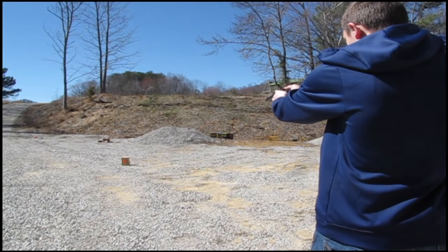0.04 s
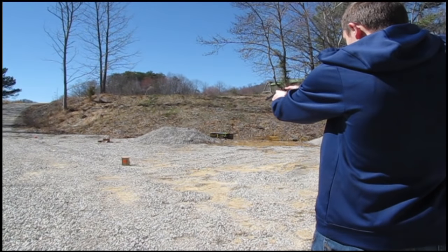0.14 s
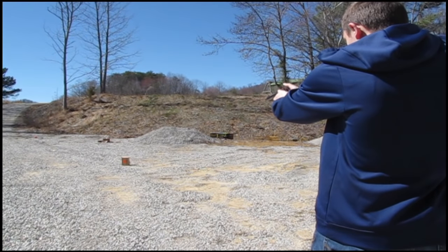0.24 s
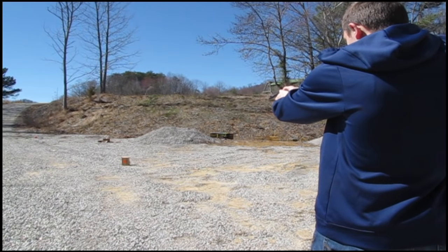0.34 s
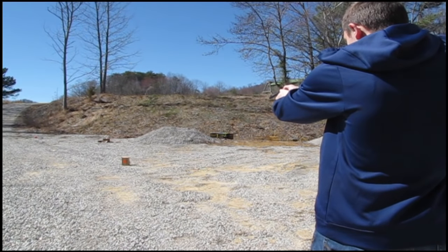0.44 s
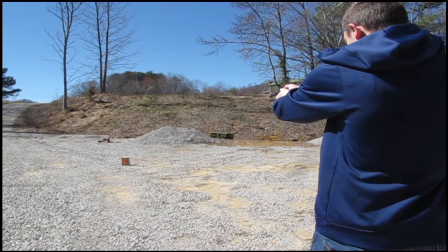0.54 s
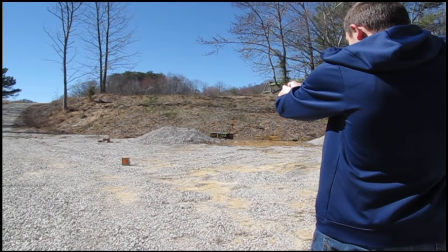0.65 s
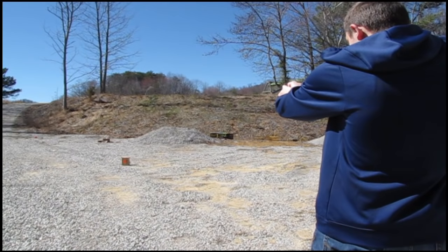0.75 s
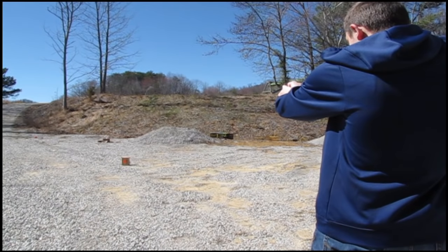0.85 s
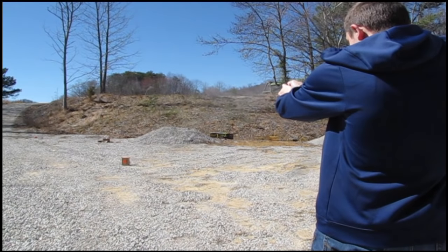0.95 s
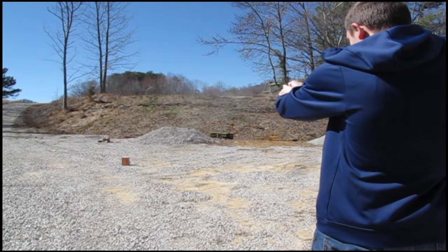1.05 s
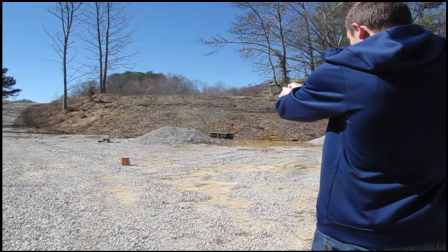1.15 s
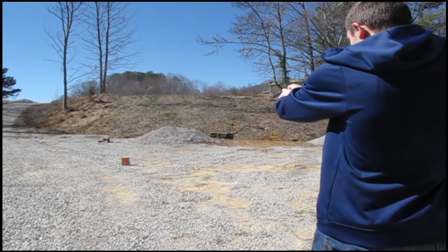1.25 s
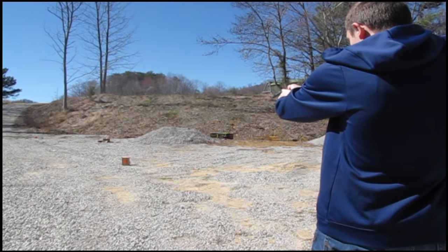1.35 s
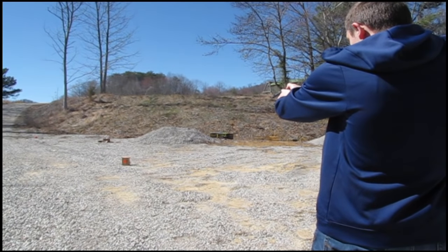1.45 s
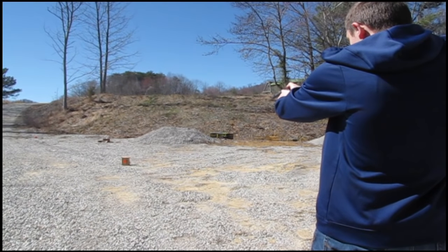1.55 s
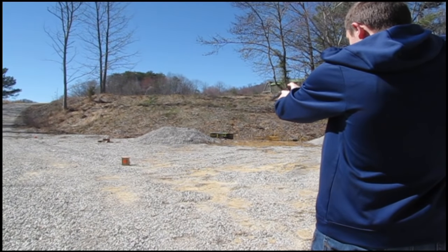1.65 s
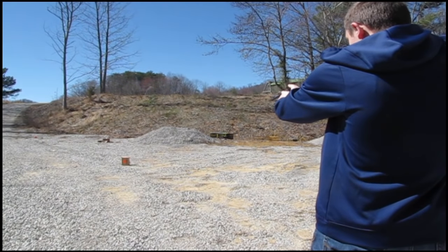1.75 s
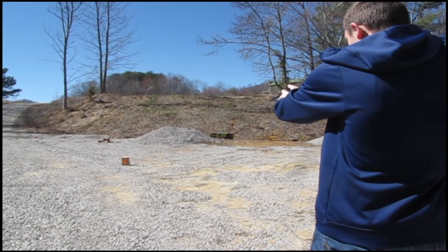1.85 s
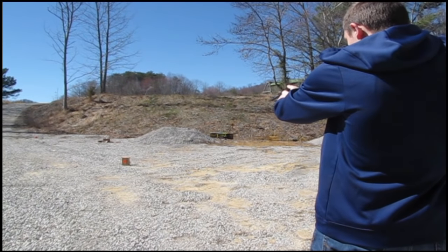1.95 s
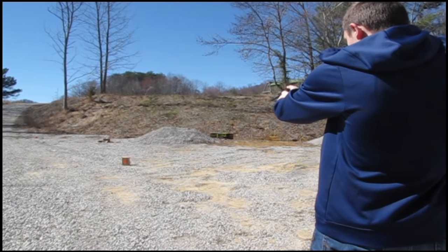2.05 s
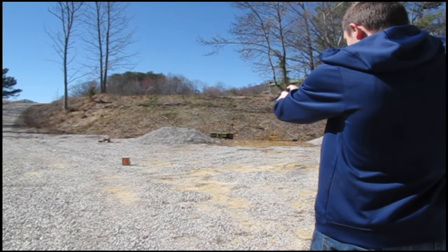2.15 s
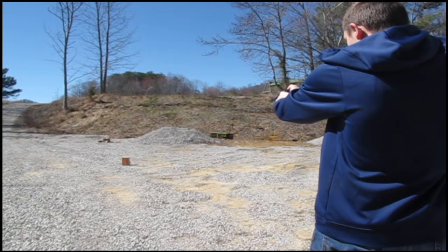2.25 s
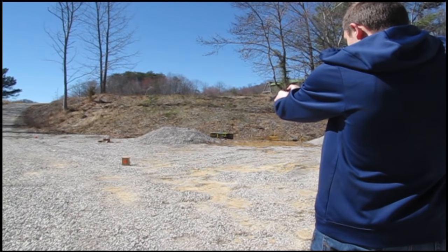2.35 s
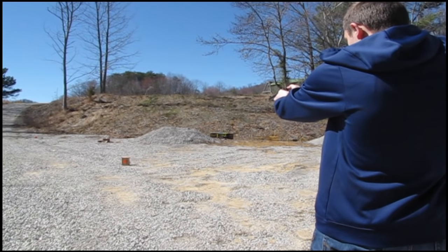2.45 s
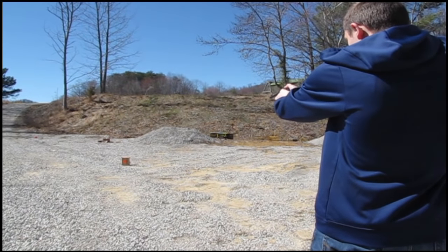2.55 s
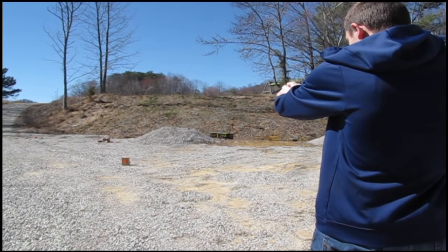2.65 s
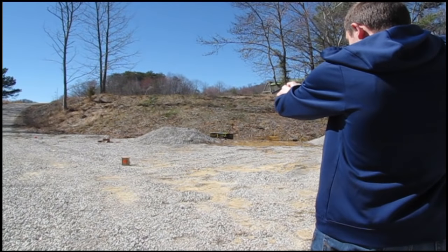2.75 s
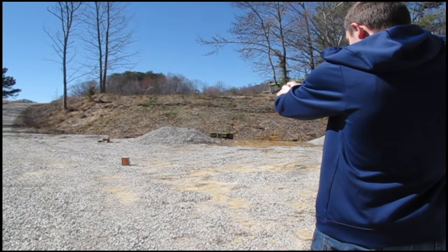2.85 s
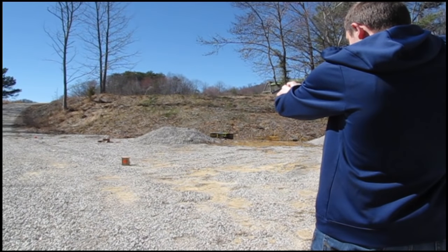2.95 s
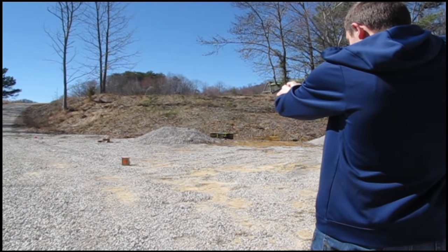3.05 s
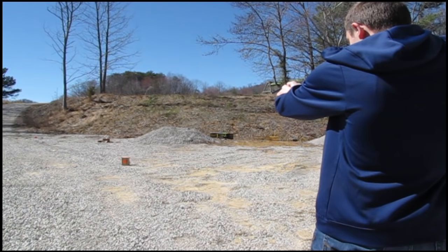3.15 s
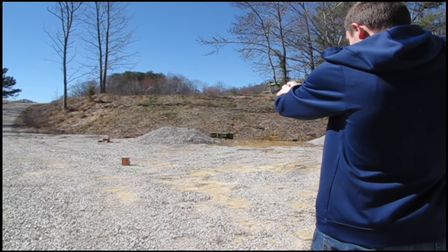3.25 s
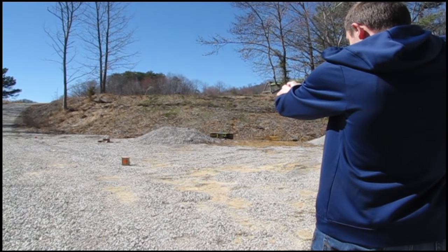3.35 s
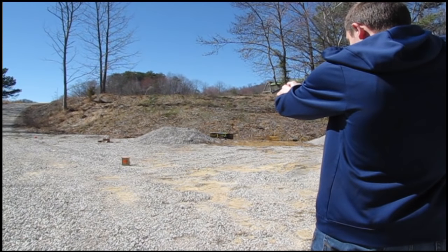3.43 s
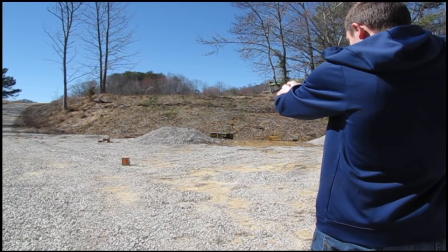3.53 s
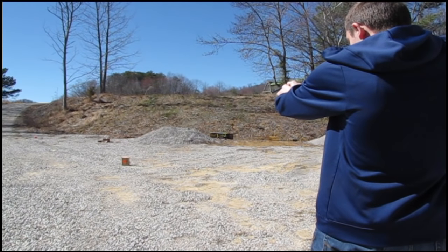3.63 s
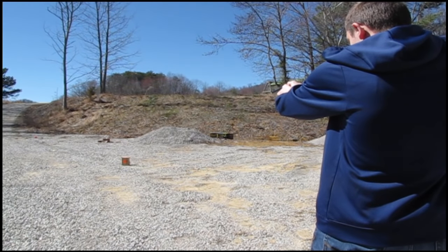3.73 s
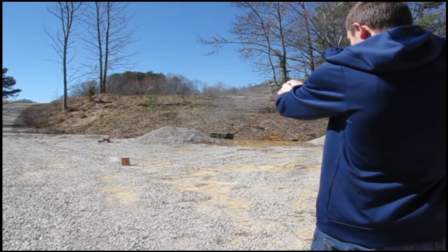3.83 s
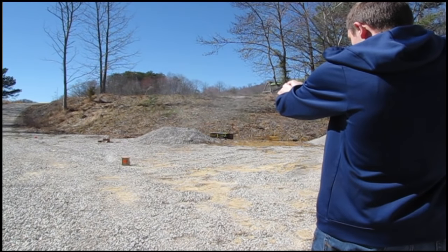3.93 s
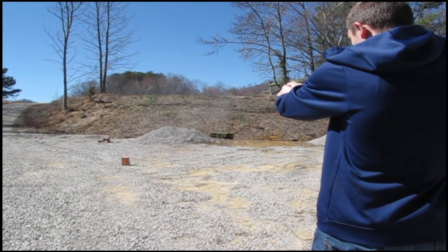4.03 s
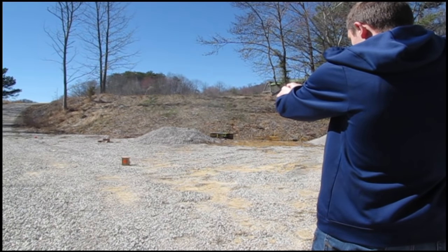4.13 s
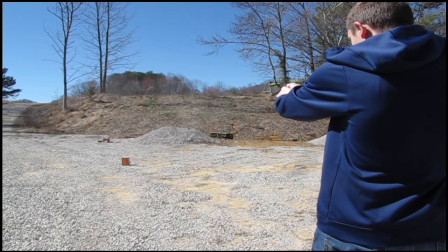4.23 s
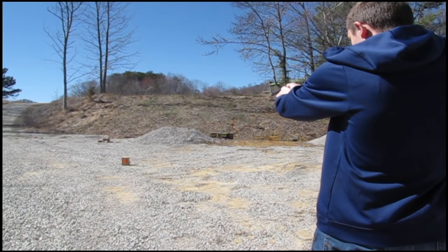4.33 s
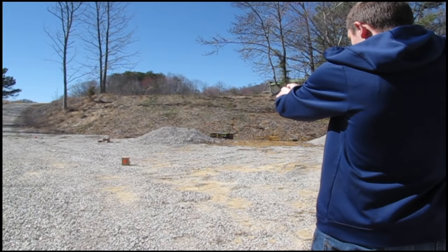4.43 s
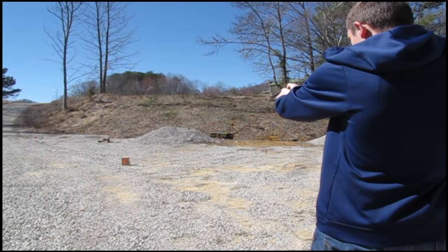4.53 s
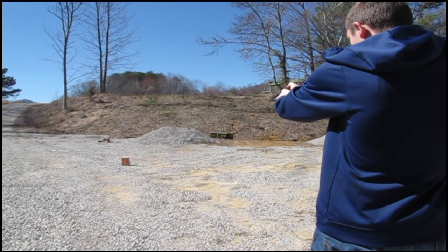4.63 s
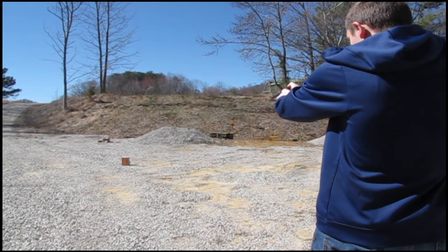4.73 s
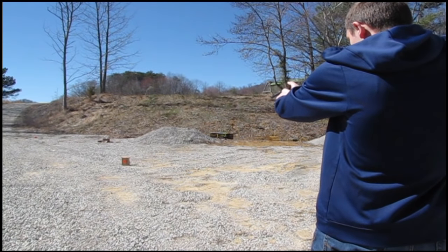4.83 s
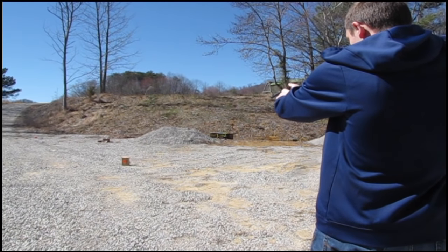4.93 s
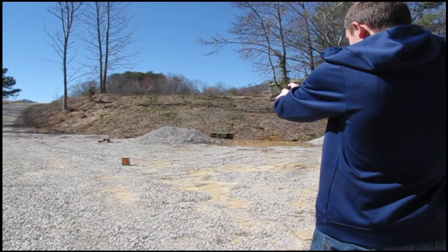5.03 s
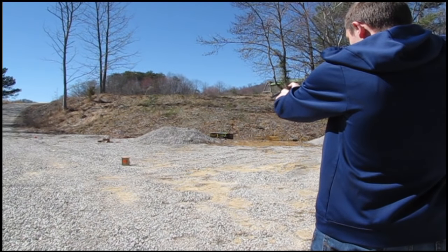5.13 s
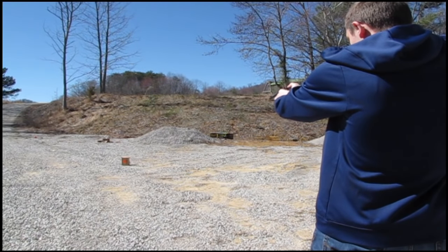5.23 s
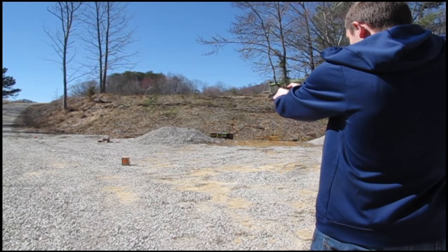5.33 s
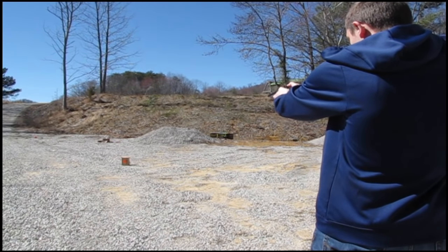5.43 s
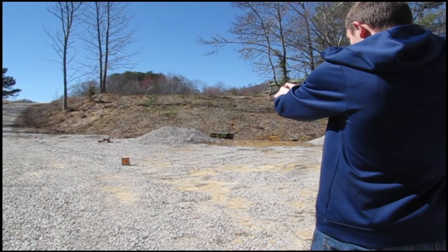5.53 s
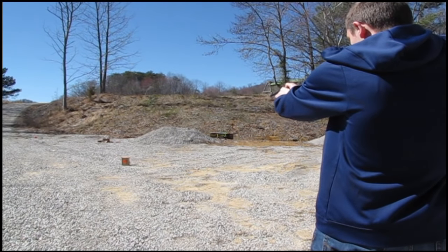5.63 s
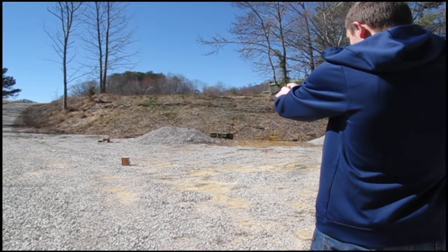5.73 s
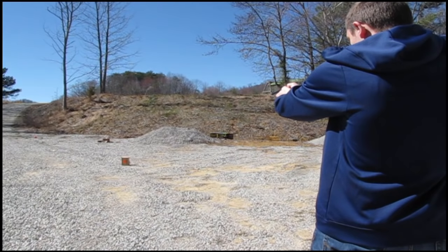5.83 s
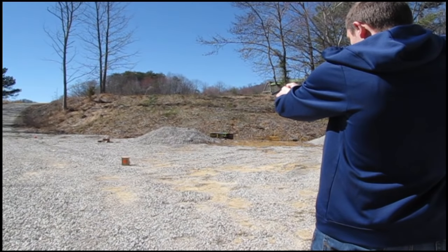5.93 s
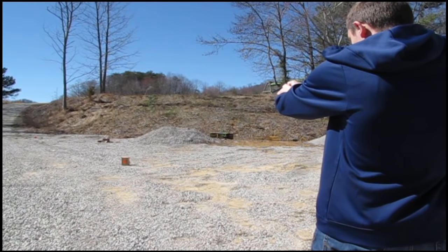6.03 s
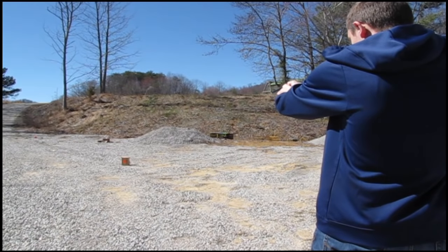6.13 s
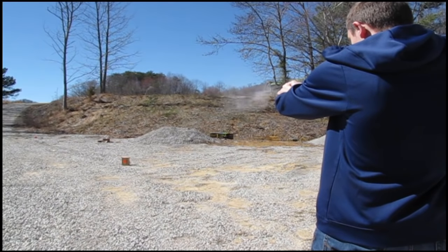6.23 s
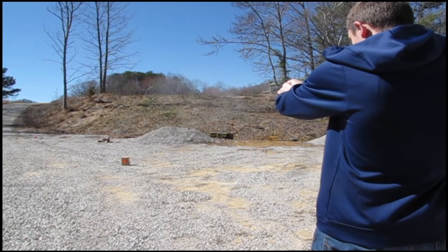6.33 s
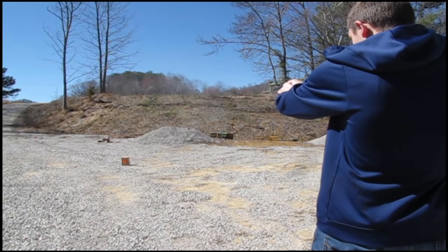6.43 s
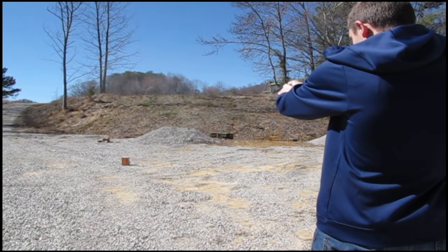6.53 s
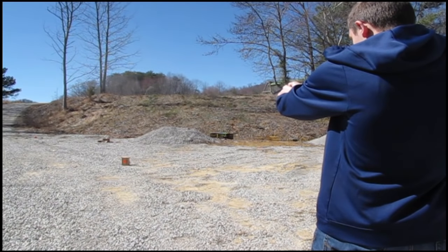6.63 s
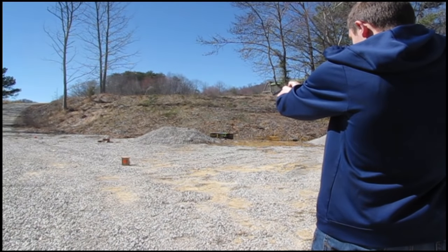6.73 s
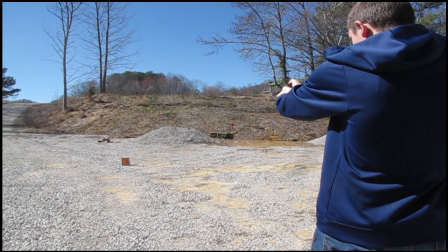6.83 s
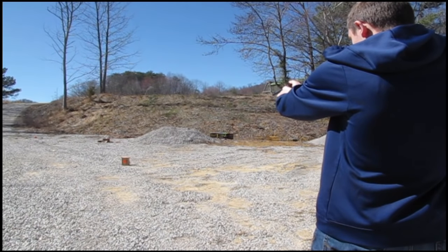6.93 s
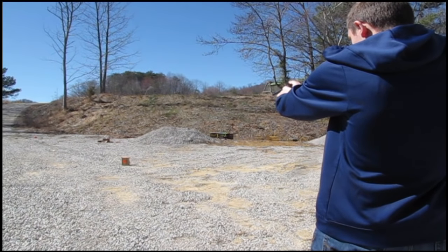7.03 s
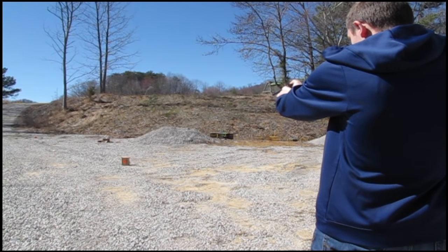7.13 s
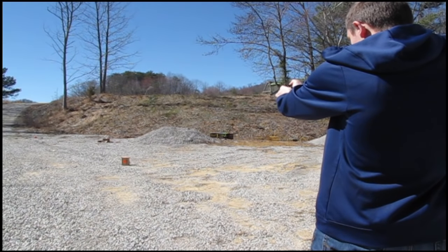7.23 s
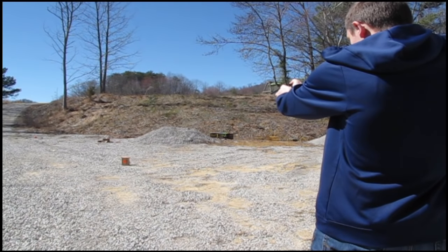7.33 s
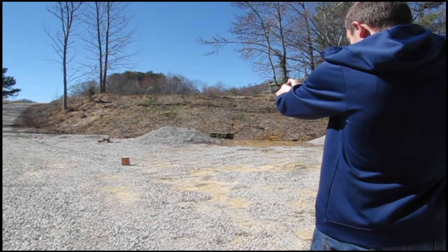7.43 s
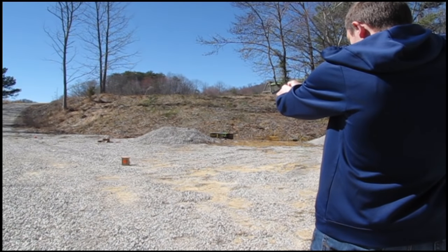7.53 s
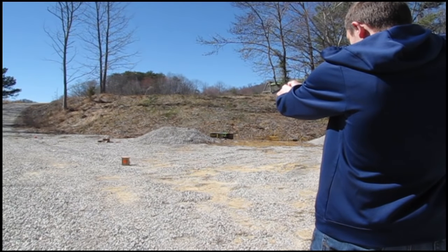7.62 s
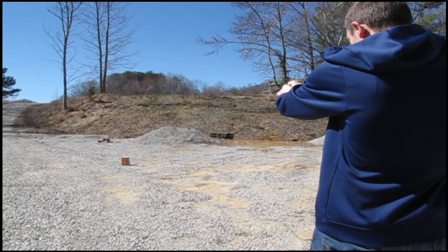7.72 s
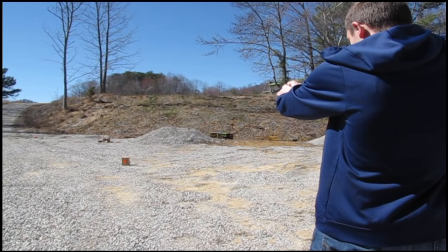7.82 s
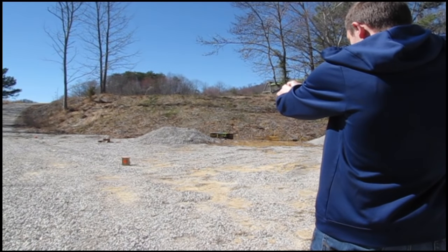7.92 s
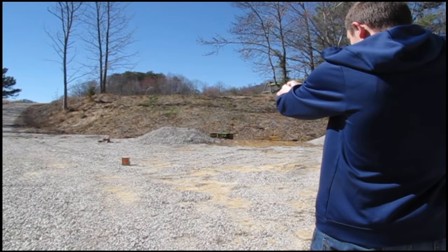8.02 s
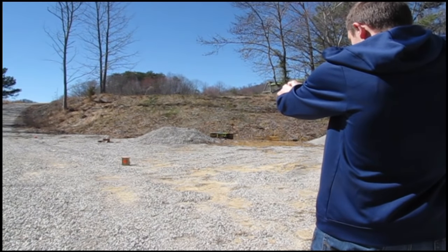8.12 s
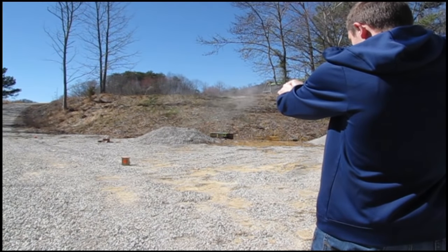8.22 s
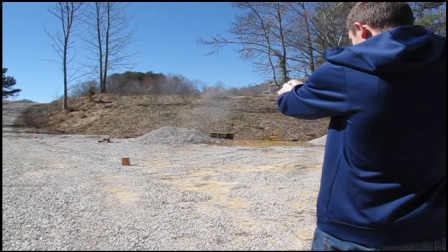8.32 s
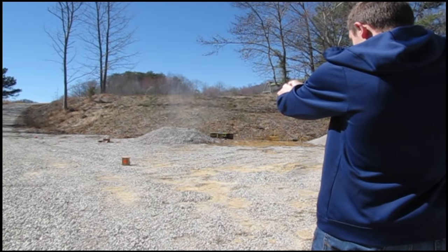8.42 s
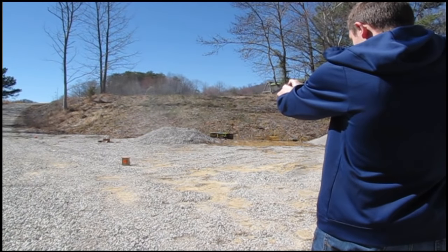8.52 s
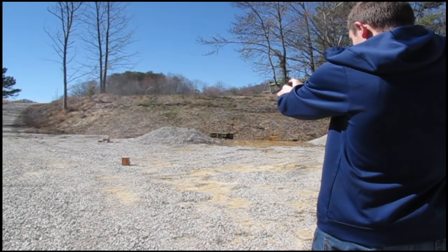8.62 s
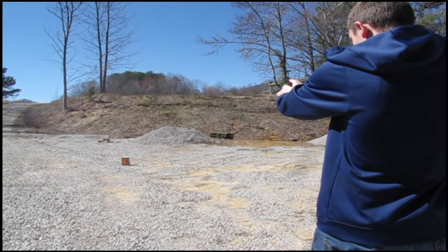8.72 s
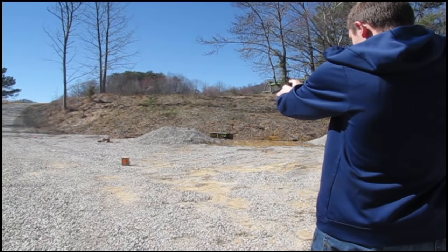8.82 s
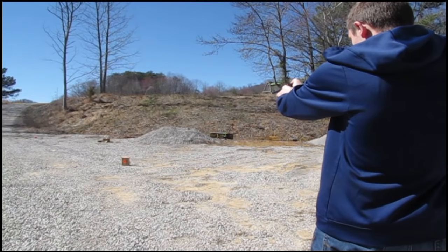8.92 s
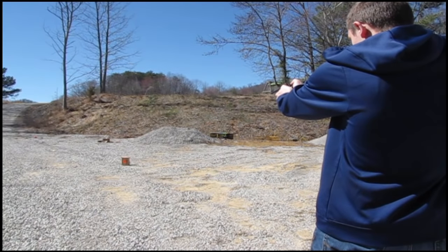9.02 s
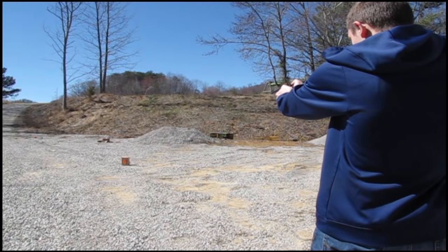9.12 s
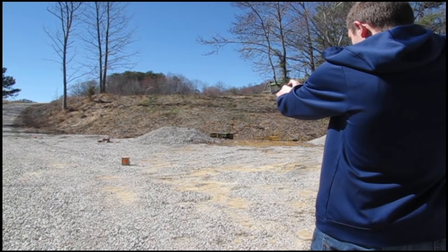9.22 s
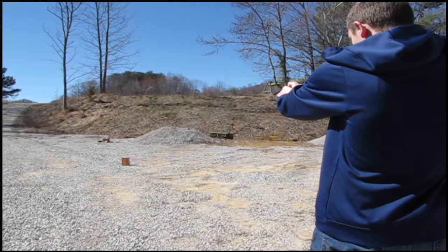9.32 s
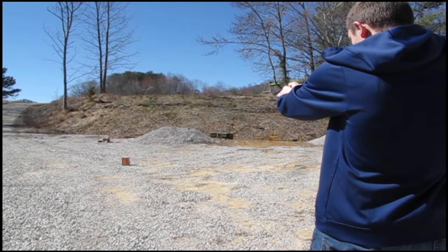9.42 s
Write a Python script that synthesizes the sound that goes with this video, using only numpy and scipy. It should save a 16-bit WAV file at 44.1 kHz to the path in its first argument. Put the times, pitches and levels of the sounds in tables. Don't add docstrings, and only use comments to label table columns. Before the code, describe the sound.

A revolver fires four times a few steps from a small camera on a gravel lot. Each shot is a hard, clipped crack with a dense slap from ground and bank, then a lumpy tree-line echo fading within about a second. Between shots, the hammer and cylinder click, metal rattles lightly, wind thumps the microphone, and leaves rustle faintly.

```python
import sys
import numpy as np
from scipy import signal
from scipy.fft import rfft, irfft, next_fast_len
from scipy.io import wavfile
from scipy.ndimage import uniform_filter1d

SR = 44100
rng = np.random.default_rng(int(sys.argv[2]) if len(sys.argv) > 2 else 0)


def to_linear_factor(level_db):
    exponent = np.asarray(level_db, float) / 20
    return 10 ** exponent


def transcribe(signal):
    frames = np.atleast_2d(signal).T
    limited = np.clip(frames, -1, 1)
    pcm = np.round(limited * 32767).astype(np.int16)
    wavfile.write(sys.argv[1], SR, pcm)


N = 417627
TOP_HZ = 15800

# time in seconds, suction strength [0-2], ground bounce strength [0-2],
# gas roar in dB.
SHOTS = [
    (.8892, 1.05, 1.6, 2),
    (3.7586, 1.7, 1.9, 2),
    (6.2480, 1.0, 1.6, 2),
    (8.1992, .65, 1.3, 2),
]
# delay in seconds, build-up in seconds, t60 in seconds,
# centre in Hz, width in Hz, level in dB.
SURFACES = [
    (.005, 0.0034, 0.073, 5447, 7023, -9),
    (.005, 0.0035, .2, 1759, 2558, -12.5),
    (.0325, .002, 0.08, 1550, 1100, -13.5),
    (.0325, .002, 0.085, 4510, 5937, -12),
    (.036, .004, 0.1, 1000, 451, -11.5),
    (.055, .01, .25, 1000, 1867, -21),
    (.02, .006, .3, 401.5, 350, -18),
    (.048, .003, 0.15, 3995, 5890, -23),
    (.13, 0.07, 0.77, 3180, 2530, -41),
    (.53, 0.03, 0.51, 970, 960, -43.5),
]


def unit(x):
    return x / np.sqrt(np.mean(x ** 2))


def on_log(table, hz):
    table_hz, value = np.transpose(table)
    return np.interp(np.log(np.maximum(hz, 1)), np.log(table_hz), value)


def band(x, hz, width):
    centre = min(hz, SR / 2.2)
    return signal.lfilter(*signal.iirpeak(centre, hz / min(width, SR / 3), fs=SR), x)


def steep(x, hz, width):
    return band(band(x, hz, width), hz, width)


def coloured(table):
    size = next_fast_len(N)
    hz = np.arange(size // 2 + 1) * SR / size
    spectrum = rfft(rng.standard_normal(size)) * to_linear_factor(on_log(table, hz))
    return unit(irfft(spectrum, size))[:N]


def walk(rate):
    k = int(SR / rate)
    held = np.repeat(rng.standard_normal(N // k + 1), k)
    return uniform_filter1d(uniform_filter1d(held, k), k)[:N]


def swell(t, delay, build, t60):
    u = np.maximum(t - delay, 0)
    return (1 - np.exp(-u / build)) * to_linear_factor(-60 * u / t60)


def revolver():
    hammer_lead_s = .007
    size = 2 ** 16
    out = np.zeros(N + size)
    t = np.arange(size) / SR
    fired = t - hammer_lead_s
    place = rng.standard_normal((len(SURFACES) + 1, size))
    for s, suction, bounce, roar_db in SHOTS:
        hammer = to_linear_factor(-25) * swell(t, 0., .00056, .06) * unit(steep(rng.standard_normal(size), 3600, 7000))
        grain = place + .72 * rng.standard_normal(place.shape)
        grain[0] = rng.standard_normal(size)
        start = int((s - hammer_lead_s) * SR)
        shot = blast(fired + .00081, suction, bounce, roar_db)
        out[start:start + size] += hammer + shot + surroundings(fired, grain)
    return out[:N]


def blast(t, suction, bounce, roar_db):
    bounce_s, muzzle_hz = .0063, 1450
    jet = swell(t, 0., .002, .06) * 1.25 / (1 + (np.maximum(t, 0) / .0032) ** 8)
    jet += .22 * swell(t, .002, .0005, .04) + .5 * swell(t, .0062, .0002, .006)
    roar = to_linear_factor(roar_db) * jet * unit(steep(rng.standard_normal(len(t)), 2900, 6500))
    flap = .3 + .6 * np.cos(2 * np.pi * muzzle_hz * (t - .0015))
    push = flap * np.exp(-((t - .0018) / .0008) ** 2)
    ground = t > bounce_s
    pull = -1.25 * suction * swell(t, .0022, .0003, .005 + .03 * suction) * ~ground
    rebound = bounce * ground * swell(t, bounce_s, .00015, .02)
    rebound = rebound / (1 + (np.maximum(t - bounce_s, 0) / .00065) ** 5)
    swing = .24 * swell(t, .009, .005, .08) - (1.25 - suction) * .55 * swell(t, .0072, .0004, .025)
    return roar + push + pull + rebound + swing


def surroundings(t, grain):
    scatter = np.zeros(len(t))
    for noise, (delay, build, t60, hz, width, db) in zip(grain, SURFACES):
        scatter += to_linear_factor(db) * swell(t, delay, build, t60) * unit(steep(noise, hz, 1.3 * width))
    return scatter + hard_returns(t, grain[0]) + tree_line(t, grain)


def hard_returns(t, chance):
    # delay in seconds, centre in Hz, width in Hz, level in dB.
    slaps = [(.0275, 1196, 1196, -14.5), (0.0334, 1494, 1499, -11.5), (0.0349, 900, 1000, -7.5),
             (0.039, 1550, 1010, -9.5), (0.0409, 1000, 1000, -11.5), (0.0454, 950, 981, -4.5),
             (0.0533, 1210, 2520, -12), (.07, 1012, 1494, -19.5), (0.0507, 9100, 7000, -15.5),
             (0.0853, 845, 700, -12), (0.0892, 910, 1000, -17), (0.092, 970, 1810, -13.5),
             (0.0917, 5006, 4500, -14), (.551, 1070, 1300, -31), (0.5718, 954, 502, -52),
             (.575, 740, 500, -40.5), (.5785, 770, 600, -31), (0.595, 847, 599.6, -44),
             (.73, 800, 600, -42), (.745, 790, 600, -43)]
    # delay in seconds, centre in Hz, level in dB.
    trunks = [(0.1174, 820, -17), (0.1216, 860, -33), (0.1254, 730, -18), (0.1391, 1190, -18),
              (0.1559, 1548, -12.5), (0.1756, 595, -15), (0.1869, 1370, -18), (0.2062, 790, -21.5),
              (0.2143, 710, -18), (0.2265, 817, -40), (0.2378, 989, -29), (0.2526, 820, -20.5),
              (0.2571, 925, -26), (0.2759, 1118, -23.5), (0.2847, 1032, -30), (0.3046, 731, -50),
              (0.3215, 903, -37), (0.3287, 989, -47), (0.3375, 890, -37), (0.3464, 731, -46),
              (0.3601, 903, -51), (0.3899, 688, -38), (0.3979, 903, -43), (0.4059, 800, -50),
              (0.4143, 817, -45), (0.4179, 930, -45), (0.4263, 860, -39), (0.4332, 680, -46),
              (0.4499, 790, -34), (0.4604, 725, -35), (0.4744, 946, -35), (0.4857, 860, -40),
              (0.508, 1118, -33), (0.6383, 688, -43.5), (0.6546, 903, -34), (0.6927, 989, -39)]
    returns = list(slaps)
    for k, (delay, hz, db) in enumerate(trunks):
        returns.append((delay, hz, .56 * hz, db - 5 + chance[k]))
    out = np.zeros(len(t))
    for delay, hz, width, db in returns:
        ring = echo(hz, width)
        at = np.searchsorted(t, delay)
        out[at:at + len(ring)] += to_linear_factor(db) * ring
    return out


def echo(hz, width):
    impulse = np.eye(1, 1024)[0]
    ring = band(steep(impulse, hz, width), hz, 2 * width)
    return -ring / np.abs(ring).max()


def tree_line(t, grain):
    # frequency in Hz, density in dB per Hz.
    trees = [(59, -56), (100, -17), (266, -7.5), (535, -4), (634, -5.5), (705, -3.5), (768, -5), (1060, -6),
             (2990, -12.5), (9610, -26), (14800, -40), (16300, -44)]
    # frequency in Hz, t60 in seconds.
    trees_t60 = [(150, 1), (400, 0.89), (900, 1.26), (2000, 0.91), (4000, 0.69), (8000, 0.54),
                 (14000, 0.61)]
    hz = np.arange(len(t) // 2 + 1) * SR / len(t)
    spectrum = rfft(grain[-1]) * to_linear_factor(on_log(trees, hz))
    spectrum = spectrum / np.sqrt(np.mean(irfft(spectrum) ** 2))
    out = np.zeros(len(t))
    for centre in 100 * 2 ** (np.arange(16) / 2):
        share = np.clip(1 - 2 * np.abs(np.log2(np.maximum(hz, 1) / centre)), 0, 1)
        fade = swell(t, .1, .012, on_log(trees_t60, centre))
        clumps = unit(uniform_filter1d(grain[0], 300))
        clumps = clumps + unit(uniform_filter1d(np.roll(grain[1], int(9 * centre)), 500))
        out += to_linear_factor(-24.5 + .89 * clumps) * fade * irfft(spectrum * share, len(t))
    return out


def lockwork():
    # frequency in Hz, level in dB, t60 in seconds.
    steel = [(1550, -11, 0.015), (2070, -7, 0.011), (2780, -7.5, 0.016), (4050, -7.5, 0.028),
             (5100, -11.5, 0.008), (7800, -16.5, .012)]
    click_hz, click_width_hz = 5000, 9000
    frame_reach_hz = 4500
    size = 3072
    out = np.zeros(N + size)
    t = np.arange(size) / SR
    rows = steel_rows()
    chance = rng.standard_normal((len(rows), 3, size))

    def ring(blow, hz):
        return unit(band(band(blow, hz, hz / 2), hz, 420 + .053 * hz))

    for (s, db, hz, second_hz, t60, rattle_db, ringing), (chatter, hiss, share) in zip(rows, chance):
        blow = chatter * swell(t, .00053, .000098, np.clip(t60, .003, .06))
        blow[20] += 4.4
        part = unit(steep(blow, max(hz, click_hz), click_width_hz))
        part = part + ringing * (ring(blow, hz) + to_linear_factor(-6.5) * ring(blow, second_hz))
        frame = np.zeros(size)
        for k, (mode_hz, mode_db, mode_t60) in enumerate(steel):
            tone = np.sin(2 * np.pi * mode_hz * (1 + .026 * share[-k - 1]) * t)
            frame += to_linear_factor(mode_db + 2.5 * share[k]) * tone * to_linear_factor(-60 * t / mode_t60)
        patches = to_linear_factor(2.5 * np.tanh(unit(uniform_filter1d(share, 120))))
        rattle = to_linear_factor(rattle_db + 3 * hiss[0]) * swell(t, .002, .0037, .087)
        rattle = rattle * patches * unit(steep(hiss, 4200, 7400))
        shake = .42 * min(frame_reach_hz / hz, 1) ** 3
        start = int(s * SR)
        out[start:start + size] += to_linear_factor(db - .5) * (part / np.abs(part).max() + shake * frame + .27 * rattle)
    return out[:N]


def steel_rows():
    # time in seconds, peak in dB,
    # ring in Hz, second ring in Hz, t60 in seconds.
    cocking = [(0.0061, -31.5, 2340, 3960, 0.026), (0.0227, -27.5, 4000, 4610, 0.0035),
               (0.1959, -31, 1570, 4840, 0.011), (1.6306, -31, 8200, 6940, 0.01),
               (2.1614, -28.5, 4660, 1690, 0.006), (2.1653, -41, 3320, 1680, 0.007),
               (2.2052, -32, 4200, 3250, 0.0057), (2.2204, -28.5, 3940, 1570, 0.0056),
               (2.2601, -28, 3810, 5770, 0.0073), (2.2673, -26.5, 5280, 4000, 0.0083),
               (2.273, -47, 9500, 2600, 0.012), (2.291, -23.5, 4000, 2130, 0.014),
               (2.471, -28.5, 1470, 2580, 0.008), (2.4737, -29, 1440, 4740, 0.011),
               (4.4862, -35, 6660, 3640, 0.006), (4.9818, -27.5, 6660, 7900, 0.0074),
               (5.043, -45, 3800, 5000, 0.056), (5.1128, -25.5, 2150, 3180, 0.003),
               (5.1181, -41, 3120, 8870, 0.006), (5.1644, -33, 9500, 10400, 0.0056),
               (5.182, -28, 3840, 2850, 0.005), (5.2262, -30, 3870, 2820, 0.0069),
               (5.2378, -34, 2630, 5150, 0.0137), (5.2397, -28.5, 2770, 3340, 0.01),
               (5.2513, -22.5, 3970, 2100, 0.0078), (5.2723, -28, 4930, 6590, 0.0064),
               (5.3604, -33, 4200, 7600, 0.012), (5.3783, -25.5, 4900, 4100, 0.026),
               (5.396, -41, 4400, 5200, 0.025), (5.4298, -28, 2270, 3000, 0.019),
               (5.435, -43, 2500, 9600, 0.01), (7.1205, -33.5, 3800, 3100, 0.0055),
               (7.195, -32, 2680, 4900, 0.015), (7.2106, -29.5, 4050, 2000, 0.0069),
               (8.9757, -35.5, 3810, 5020, 0.009), (8.9938, -33, 4180, 2070, 0.0084),
               (9.1884, -34.5, 3730, 1580, 0.013)]
    # time in seconds, peak in dB, ring in Hz.
    settling = [(0.1497, -40, 6950), (.174, -49, 6000), (.2892, -55, 4500), (0.4873, -43, 3760),
                (.5026, -45, 3650), (.5683, -44, 4980), (.581, -41, 3930), (.7564, -43, 3300),
                (1.5516, -45, 4140), (1.7333, -41.5, 4560), (1.8333, -35.5, 4700), (2.3263, -43, 8200),
                (2.5065, -42, 4870), (4.3093, -48, 2140), (4.513, -38.5, 4540), (4.5823, -52, 4200),
                (5.0015, -45, 4790), (5.198, -39, 2870), (7.1515, -42, 2820), (7.1893, -33.5, 4500),
                (7.202, -36, 5130), (7.3662, -35.5, 2580), (8.8912, -38, 6500), (8.945, -41, 4580),
                (8.9677, -40, 4390), (9.1233, -48.5, 5510), (9.2497, -53, 3060), (9.3834, -42.5, 4580),
                (9.4245, -56, 3080)]
    sear = [
        (.8642, -29, 4000),
        (3.7347, -26, 4000),
        (6.2225, -32, 4200),
        (8.1735, -34, 3800),
    ]
    spring = [(.094, -49, 5950), (.2186, -47, 6900), (.3709, -41, 11780), (.3758, -38, 8000),
              (.552, -48, 6110), (4.2812, -38, 6730), (4.3221, -41, 7000), (4.3885, -44, 5670),
              (4.4549, -38, 5600), (4.5076, -42, 6270), (4.7246, -41, 6140), (4.824, -44, 5980),
              (4.8806, -34, 7560), (5.0857, -42, 8600), (5.231, -31, 8370), (5.3462, -41, 5400),
              (5.529, -35.5, 5440), (6.738, -50.5, 6630), (6.76, -43, 8900), (6.794, -51, 9500),
              (6.898, -46, 8650), (6.926, -54, 7960), (6.942, -55, 7030), (7.0445, -57.5, 5360),
              (7.3825, -47, 6730), (5.1906, -36, 2900), (2.2658, -41, 11500), (2.247, -40, 4500),
              (5.148, -43, 3000), (8.7857, -39.5, 6900)]
    creep = [(0.1356, -57.0, 6450.0), (0.1579, -43, 3956.0), (0.2306, -54.0, 8428.0),
             (0.2463, -55.0, 7482.0), (0.2687, -55.0, 4900), (0.3376, -62, 6278.0), (0.6292, -58, 4558.0),
             (1.4277, -45, 6800), (1.5747, -62, 6708.0), (1.6137, -58.0, 8342.0), (1.6695, -46, 5800),
             (1.9555, -54, 8342.0), (1.9692, -55, 8858.0), (2.011, -52, 4558.0), (2.0216, -55, 5504.0),
             (2.146, -58.0, 3526.0), (2.1957, -50, 6966.0), (4.4322, -48, 3500), (4.5251, -43, 4128.0),
             (4.5544, -46, 4730.0), (4.5591, -52, 4472.0), (4.5646, -49, 4558.0), (4.5781, -56.0, 6708.0),
             (4.626, -48, 4816.0), (4.6366, -59.0, 4280), (4.6581, -62, 6450.0), (4.7213, -48, 6150),
             (4.7662, -49, 3600), (4.7819, -62, 9546.0), (4.8099, -52, 6106.0), (5.3285, -42, 7912.0),
             (7.1131, -62, 3612.0), (7.2286, -46, 9288.0), (7.2449, -46, 9030.0), (7.4145, -51, 6536.0),
             (7.6191, -53, 5590.0), (8.7688, -51, 11438.0), (8.7776, -50, 8980), (8.9232, -49.5, 4214.0),
             (8.9803, -48, 10922.0), (9.1394, -56, 3980), (9.1436, -55.5, 3956.0), (9.3123, -63, 4472.0),
             (9.3592, -55, 3096.0), (9.3765, -52.0, 6536.0), (9.388, -52.5, 4644.0)]
    grit = [(.9385, -13, 10400), (1.0895, -25, 8500), (1.0945, -31, 11500), (1.290, -47, 9500),
            (3.8105, -14, 11000), (4.1475, -51, 14000), (4.194, -57, 9000), (4.2194, -51, 8500),
            (4.259, -53, 6500), (4.2745, -47, 8500), (4.1815, -48, 10000), (8.2475, -11, 7940),
            (8.5541, -44, 9200), (8.561, -50, 12000), (5.4648, -47, 7500), (5.607, -52.5, 8000),
            (5.6274, -54, 4540), (8.803, -52.5, 9500), (8.811, -55, 7000), (9.028, -53, 8100),
            (.058, -46, 8000)]
    kinds = [(settling, .013, -17), (sear, .0022, -29), (spring, .01, -12), (creep, .005, -25), (grit, .005, -29)]
    rows = [(*row, -14.5, 2) for row in cocking]
    for ticks, t60, rattle_db in kinds:
        for s, db, hz in ticks:
            rows.append((s, db, hz, min(1.3 * hz, TOP_HZ), t60, rattle_db, .8))
    return rows


def latch():
    u = np.arange(N) / SR - .35556
    push = np.exp(-(u / .000042) ** 2)
    push = push - .3 * np.exp(-((u - .00013) / .00017) ** 2) + .17 * np.exp(-((u - .0005) / .00007) ** 2)
    noise = unit(steep(rng.standard_normal(N), 4500, 6000))
    fizz = to_linear_factor(-24) * swell(u, .0002, .0002, .012)
    fizz = fizz + to_linear_factor(-38) * swell(u, .00073, .0012, .11) + to_linear_factor(-51.5) * swell(u, .02, .025, .87)
    return to_linear_factor(-6.5) * (push + fizz * noise)


def scuffs():
    # time in seconds, build-up in seconds, t60 in seconds, centre in Hz, level in dB.
    swishes = [
        (.0, 0.0031, 0.16, 7000, -51),
        (2.15, 0.033, .9, 3200, -64),
        (5.37, 0.0082, 0.4, 4600, -52.5),
        (.41, .03, 0.37, 4750, -51.5),
        (4.445, .006, 0.056, 6480, -44.5),
        (4.82, 0.0048, 0.14, 6860, -49.5),
        (4.88, 0.0021, 0.18, 7500, -49.5),
        (5.18, 0.012, 0.38, 6040, -65),
        (7.15, 0.0092, 0.092, 3000, -59),
    ]
    t = np.arange(N) / SR
    noise = rng.standard_normal(N) * to_linear_factor(3 * walk(300))
    out = np.zeros(N)
    for s, build, t60, hz, db in swishes:
        out += to_linear_factor(db) * swell(t, s, build, t60) * unit(steep(noise, hz, 1.8 * hz))
    return out


def buffeting():
    # frequency in Hz, density in dB per Hz.
    buffet = [(8.8, -33.5), (15, 0), (32, 1), (51, -1.5), (133, -18), (161, -24), (260, -35), (340, -59),
              (570, -120)]
    split_hz = 48
    air = unit(coloured(buffet) * to_linear_factor(4.9 * walk(16)))
    heave = signal.sosfiltfilt(signal.butter(2, split_hz, fs=SR, output="sos"), air)
    flutter = evened(air - heave, .02) * wind_gain(1) * to_linear_factor(-9)
    return evened(heave, .025) * wind_gain(0) * to_linear_factor(-6) + flutter


def evened(x, span_s):
    k = int(span_s * SR)
    power = uniform_filter1d(uniform_filter1d(x ** 2, k), k)
    return unit(x / (power + .01 * np.mean(x ** 2)) ** (.36 / 2))


def wind_gain(flutter):
    # time in seconds, level in dB.
    breeze = [(0, -50), (.55, -50), (.8, -44.5), (1.2, -63), (1.9, -64.5), (2.1, -54), (2.68, -42.5),
              (3.1, -37), (3.7, -41), (4.1, -66.5), (4.85, -54), (5.3, -40), (5.7, -44.5), (6.2, -38),
              (6.6, -70), (7.1, -65.5), (8.1, -46.5), (8.5, -65)]
    # time in seconds, peak in dB, width in seconds, flutter over heave in dB.
    eddies = [(.72, -51, 0.025, 7), (1.42, -61, 0.026, -2), (2.745, -30.5, 0.014, 10),
              (2.801, -23.5, 0.029, 7), (2.85, -28, 0.021, 8), (2.96, -34, 0.039, 10),
              (3.12, -36, 0.024, 1), (3.2, -25, 0.019, -10), (3.299, -17, 0.022, -18), (3.5, -41, 0.017, 7),
              (3.58, -32.5, 0.047, -8), (3.66, -40, .02, -1), (3.725, -19.5, 0.012, 4),
              (4.3, -48, 0.032, 16.5), (4.42, -48.5, 0.058, 3), (4.58, -47, 0.065, -5),
              (4.9, -31.5, 0.016, -4), (5.04, -35.5, 0.074, -5.5), (5.22, -40.5, 0.035, 4),
              (5.38, -31, 0.016, -16), (5.5, -27, 0.024, -8), (5.56, -34, 0.037, -12),
              (5.88, -39.5, 0.039, -4), (6.04, -37, 0.037, -1), (6.12, -43, 0.029, -3),
              (6.199, -34, 0.024, -2), (6.77, -56, 0.043, -6), (7.12, -51, 0.029, -8),
              (7.31, -45, 0.059, -2), (7.5, -36, 0.079, 2.5), (7.67, -49, 0.019, -1),
              (8.04, -53.5, 0.022, -3.5), (8.151, -50, 0.032, 2.5), (8.72, -49, 0.028, -2),
              (9.22, -50, .03, 0), (9.4, -58.5, 0.15, 2)]
    t = np.arange(0, N, 32) / SR
    gain = to_linear_factor(np.interp(t, *np.transpose(breeze)))
    for s, db, width, tilt_db in eddies:
        gain = gain + to_linear_factor(db + flutter * tilt_db) * np.exp(-((t - s) / width) ** 2)
    return np.interp(np.arange(N) / SR, t, gain)


def since_shot():
    t = np.arange(N) / SR
    fired = np.array([-.92] + [row[0] for row in SHOTS])
    return t - fired[np.searchsorted(fired, t) - 1]


def far_road():
    # frequency in Hz, density in dB per Hz.
    road = [(59, -31.5), (100, -7.5), (129, -17), (247, -9.5), (510, -7.5), (744, -8), (1220, -14.5),
            (1670, -25), (2500, -33.5), (3250, -44), (5500, -64)]
    hills_delay_s, hills_spread_s = 1.154, .3
    hills = to_linear_factor(2 * -49.5) * np.exp(-((since_shot() - hills_delay_s) / hills_spread_s) ** 2)
    return coloured(road) * np.sqrt(to_linear_factor(2 * -56.5) + hills) * to_linear_factor(1.4 * walk(6))


def dry_leaves():
    # frequency in Hz, density in dB per Hz.
    leaves = [(880, -39.5), (1500, -0.5), (2430, -2), (6350, -7.5), (9770, -12), (15200, -21.5),
              (16000, -27), (16400, -42.5)]
    # time in seconds,
    # build-up in seconds, level in dB.
    rustles = [
        (.1, .2, -67.5),
        (.685, 0.0057, -63.5),
        (2.3, 0.029, -67),
        (2.64, 0.0035, -63),
        (5.0, 0.058, -67.5),
        (6.0, 0.0093, -62.5),
        (7.5, .4, -64.5),
        (8.02, 0.019, -70),
    ]
    t = np.arange(N) / SR
    latest_shot = t - since_shot()
    rustle = np.zeros(N)
    for s, build, db in rustles:
        rise = 1 - np.exp(-np.maximum(t - s, 0) / build)
        rustle += to_linear_factor(2 * db) * (latest_shot < s) * rise ** 2
    hush = to_linear_factor(2 * -72)
    flicker = coloured(leaves) * np.sqrt(hush + rustle) * to_linear_factor(1.3 * walk(14))
    wash = unit(steep(rng.standard_normal(N), 238, 270)) * np.sqrt(rustle) * to_linear_factor(7.5 + 1.9 * walk(33))
    return flicker + wash


def crow():
    # time in seconds, pitch in Hz, level in dB.
    caw = [
        (8.98, 840, -90),
        (9.01, 830, -68),
        (9.09, 800, -67),
        (9.16, 775, -69),
        (9.19, 765, -90),
    ]
    # multiple of the pitch, level in dB.
    caw_partials = [(2, 1), (3, -6)]
    s, hz, db = np.transpose(caw)
    t = np.arange(N) / SR
    pitch = np.interp(t, s, hz) * (1 + .012 * walk(90))
    phase = 2 * np.pi * np.cumsum(pitch) / SR
    return to_linear_factor(np.interp(t, s, db)) * sum(to_linear_factor(g) * np.sin(k * phase) for k, g in caw_partials)


def scene():
    gun = revolver() + lockwork() + latch() + scuffs()
    return (gun + buffeting() + far_road() + dry_leaves() + crow())[None]


def gated(x, hz, db):
    top = signal.sosfiltfilt(signal.butter(10, hz, "high", fs=SR, output="sos"), x)
    faint = np.sqrt(uniform_filter1d(top ** 2, 1024) + 1e-14) < to_linear_factor(db)
    return x - top * uniform_filter1d(faint * 1., 128)


def roll_off(x):
    return signal.sosfilt(signal.butter(12, 16600, fs=SR, output="sos"), x)


def record(dry):
    # edge in Hz, threshold in dB.
    gates = [(13000, -89), (14600, -96)]
    dull = signal.sosfilt(signal.ellip(8, .2, 60, TOP_HZ, fs=SR, output="sos"), dry)
    mix = np.clip(dull, -.99, .99)
    for hz, db in gates:
        mix = gated(mix, hz, db)
    return roll_off(mix)


dry = scene()
out = record(dry)
transcribe(out)
```